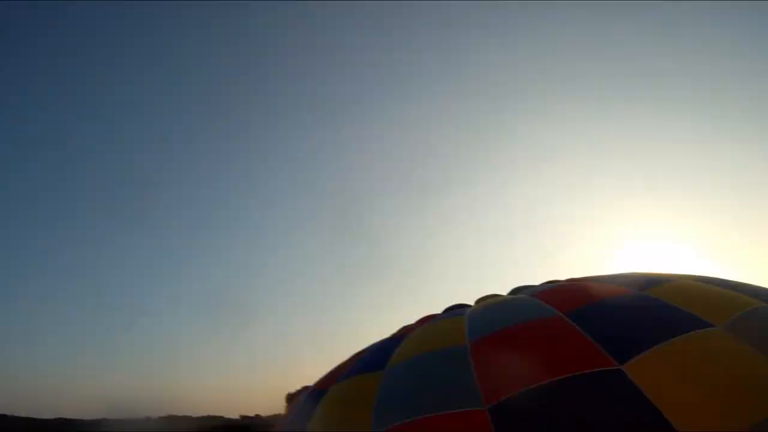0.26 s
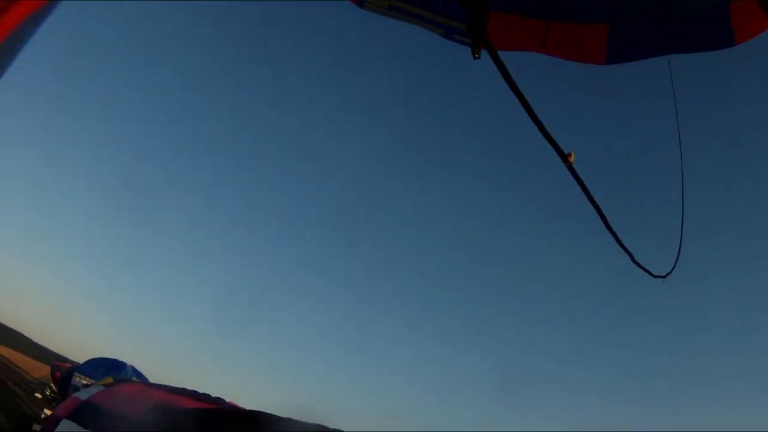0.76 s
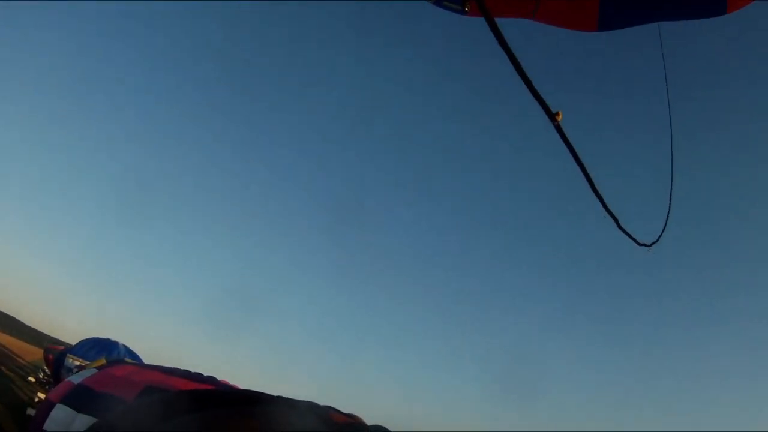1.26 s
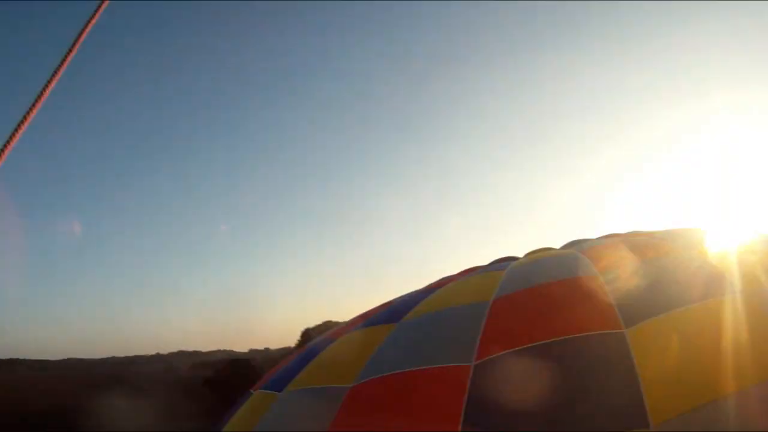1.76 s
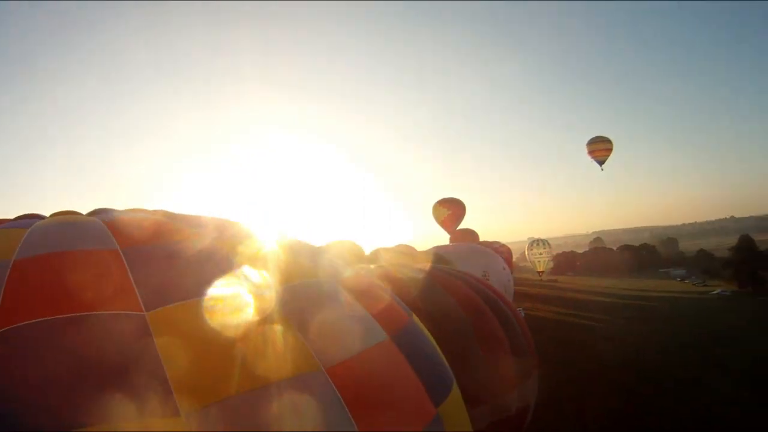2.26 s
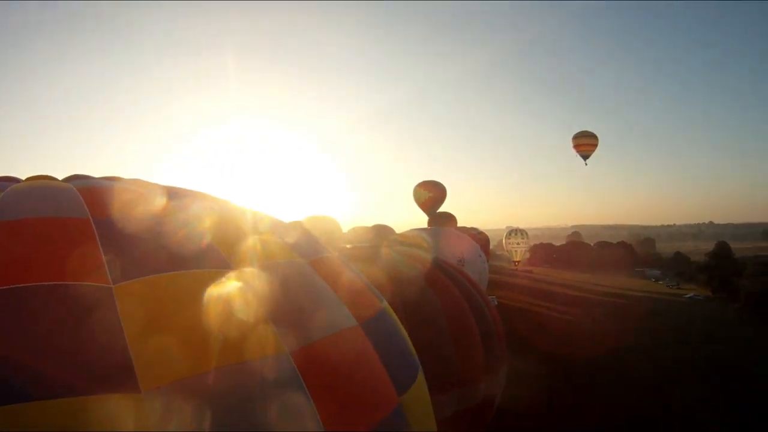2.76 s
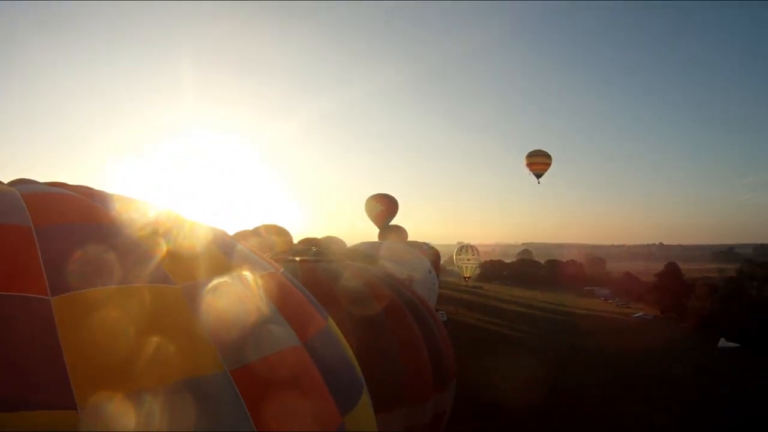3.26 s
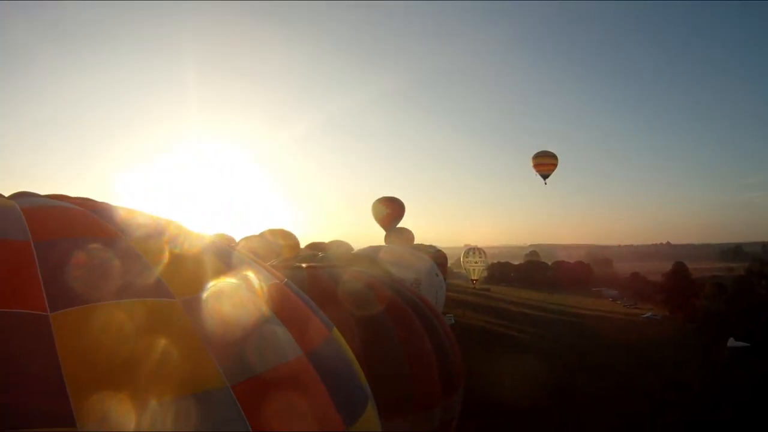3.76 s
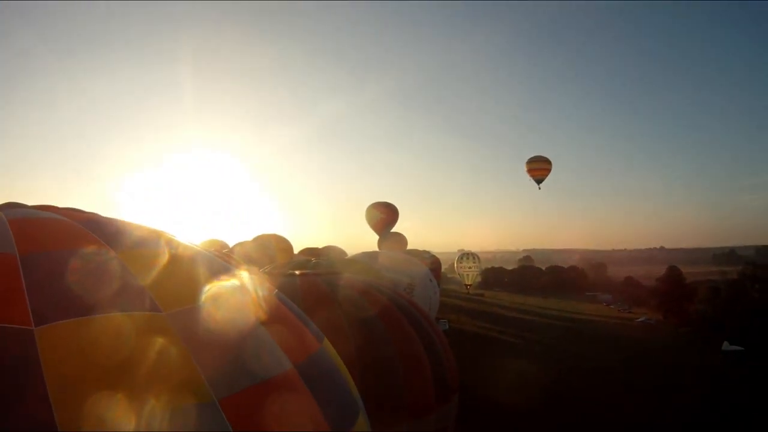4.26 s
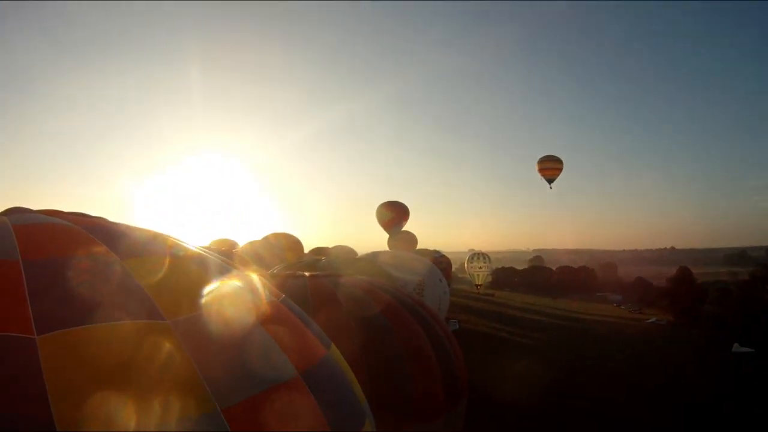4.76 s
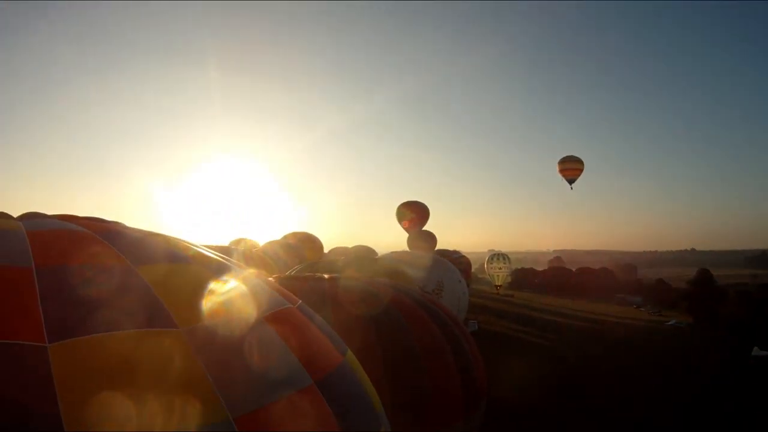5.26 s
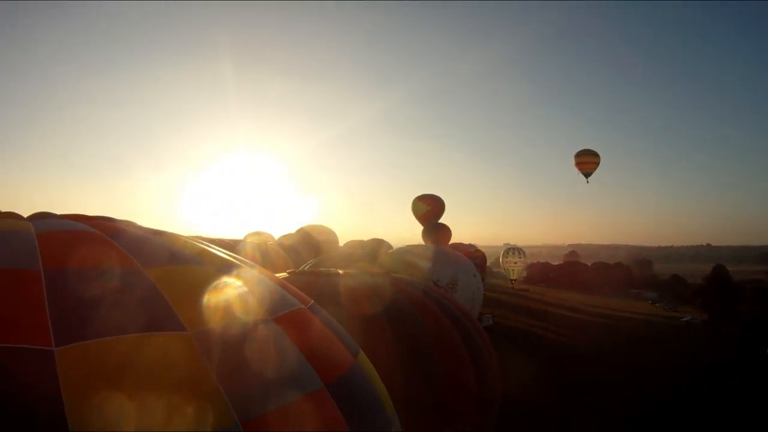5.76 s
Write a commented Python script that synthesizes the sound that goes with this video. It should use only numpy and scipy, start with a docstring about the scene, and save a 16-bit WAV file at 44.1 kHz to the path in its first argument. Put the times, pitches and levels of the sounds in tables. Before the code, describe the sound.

Close beside a small camera in a sealed housing, a hot-air balloon's gas burner is already swelling at 0 s: a low, lumpy roar with a faint jet hiss, and a boxy thump at 0.1 s. It dies away by about 0.45 s, leaving a steady, low rush and rumble from other burners. Near 1.66 s thin gas hiss escapes, then a sharp crack and heavy double thump light a long blast that builds to 2 s, swells around 2.6 and 3.5 s, and dies by 3.6 s. The softer rush remains, slowly weakening. At 4.8 s a cluster of cracks and thuds starts a harder, brighter blast, with more thumps near 5 s, fading by 5.4 s. After a short gap, a last strong blast lights at 5.6 s with several thumps and is easing as the sound ends. Peaks clip and push the level down; the sound is muffled, gritty and outdoors.

```python
"""First a balloon's gas burner is heard in mid-swell: a low roar with a jet hiss on top, then a thump.
It fires in bursts beside a small camera in a closed housing; the roar and hiss are shaped noise, and
pressure pushes make the thumps, with sharp cracks and a thin unlit hiss around some lightings.
Between bursts a steadier rush from other burners remains, made of roar, hiss and rumble noise.
The recorder turns itself down on peaks, clips, and holds every sample of a slow converter."""
import sys
import numpy as np
from scipy import signal
from scipy.fft import rfft, irfft
from scipy.io import wavfile
from scipy.ndimage import minimum_filter1d

SR = 44100
rng = np.random.default_rng(int(sys.argv[2]) if len(sys.argv) > 2 else 0)


def volts_from_db(level):
    """Convert decibel levels to linear amplitude ratios."""
    exponent = np.asarray(level, float) / 20
    return 10 ** exponent


def store_wav(level_fs):
    """Save 16-bit WAV to argv[1]."""
    pcm = np.round(np.clip(np.atleast_2d(level_fs), -1, 1) * 32767)
    wavfile.write(sys.argv[1], SR, pcm.T.astype(np.int16))


N = 264600   # length in samples: 6 s

# All source levels are those ahead of the recorder.
# The distant rush over time: t/s, roar level/dB, hiss level/dB
RUSH_LEVELS = [(.5, -34, -60.5), (.7, -34, -59), (1.0, -34, -56), (1.6, -32.5, -55.5), (3.7, -36.5, -58.5),
               (4.7, -38.5, -58.5), (5.5, -39, -58.5)]
# Noise colours, from power per Hz; only the shape counts: f/Hz, level/dB
RUSH_ROAR_COLOUR = [(12, -44), (20, -25), (54, -2.5), (202, -0.5), (221, -5.5), (489, -4.5), (597, -11.5),
                    (1120, -40), (1500, -43), (1950, -52), (3300, -120)]
RUSH_HISS_COLOUR = [(710, -34), (1200, -2.5), (1250, -8.5), (1790, -7), (2130, 1.5), (2710, -1), (3280, -6),
                    (3800, -9), (4060, -12), (4930, -10), (5340, -19.5), (5900, -22.5), (7670, -65),
                    (13000, -120)]
RUMBLE_COLOUR = [(20, -19), (50, -4), (90, -4.5), (170, -4.5), (300, -39)]
ROAR_COLOUR = [(12, -50), (20, -24), (91, -1.5), (225, 0.5), (347, -3), (498, -2), (653, -9), (769, -17.5),
               (955, -38.5), (1500, -40), (1950, -36), (3300, -120)]
JET_COLOUR = [(760, 1), (1300, -15.5), (1530, -17), (2120, -1.5), (2340, -7.5), (2580, -7), (2920, -8),
              (3360, -16.5), (3760, -18.5), (4010, -22), (4910, -11.5), (5200, -18), (5680, -29),
              (5900, -25), (7670, -63), (13000, -120)]
# Gas that streams out before it lights: start t/s, lit t/s, final level/dB
UNLIT_GAS = [(1.657, 1.694, -43.5), (1.69, 1.75, -47), (4.804, 4.815, -50)]
# Flame thumps, before the housing: t/s, peak level/dB, push length/ms, sign (push 1 or pull -1)
THUMPS = [(0.113, 0, 2.1, 1), (1.687, 1.5, 6.4, 1), (1.704, 3.5, 4.35, 1), (4.793, -11, 2.9, 1),
          (4.802, -8.5, 1.6, 1), (4.805, -3.5, 2.1, -1), (4.817, -1, 2.9, -1), (4.95, 1, 2.8, 1),
          (5.061, -1.5, 2.75, -1), (5.606, -7.5, 3.2, -1), (5.614, -4, 3.1, 1), (5.667, 0, 2.7, 1),
          (5.735, -0.5, 1.16, 1)]
# Cracks of the flame front as gas lights, before filtering: t/s, peak level/dB
CRACKS = [(1.688, 4), (1.709, -9), (4.806, 6), (5.605, -14)]
# The burner valve, levels before swells and lumps: opens t/s, full flame t/s, eases off t/s,
# shuts t/s, dying time/s, roar level/dB, jet hiss level/dB
BURSTS = [(-.1, 0.048, .15, .37, 0.097, -10.5, -34), (1.663, 1.678, 1.57, 1.73, .025, -16.5, -39.5),
          (1.74, 2.01, 3.1, 3.535, 0.079, -10.5, -30), (4.787, 4.854, 4.79, 5.32, .09, -7.5, -25.5),
          (5.589, 5.658, 5.57, 5.95, 0.059, -7, -27)]
# Swells of the flame: t/s, extra roar level/dB, half width/s (to 1/e of the extra dB)
SWELLS = [(2.58, 2, 0.12), (2.97, 1, 0.36), (3.5, 3, 0.095), (5.05, 0.5, .04), (5.22, 2, 0.033),
          (5.7, 0.5, .04)]


def rms_one(x):
    """Scale to rms 1."""
    return x / np.sqrt(np.mean(x ** 2) + 1e-20)


def in_time(rows):
    """Join the columns of a table by straight lines in time."""
    seconds, *columns = np.transpose(rows)
    return [np.interp(np.arange(N) / SR, seconds, column) for column in columns]


def coloured(spectrum):
    """Noise with the given balance of low and high sound; rms 1."""
    hz, db = np.transpose(spectrum)
    log_hz = np.log(np.arange(N // 2 + 1) * SR / N + 1)   # the 1 avoids log of zero
    shape = volts_from_db(np.interp(log_hz, np.log(hz), db, -90, -90))
    return rms_one(irfft(rfft(rng.standard_normal(N)) * shape, N))


def drift(pole_hz):
    """Slow chance wandering: noise through two equal low-pass filters; rms 1."""
    r = np.exp(-2 * np.pi * pole_hz / SR)
    noise = rng.standard_normal(N + SR)
    slow = signal.lfilter([1], [1, -2 * r, r * r], noise)
    return rms_one(slow[SR:])   # the first second lets the filter settle


def rush():
    """Far burners: a smooth roar and hiss over a slowly lumping rumble."""
    rumble_db = -9   # relative to the rush's roar
    roar_db, hiss_db = in_time(RUSH_LEVELS)
    roar = volts_from_db(roar_db + 0.93 * drift(25)) * coloured(RUSH_ROAR_COLOUR)
    hiss = volts_from_db(hiss_db + 0.5 * drift(14)) * coloured(RUSH_HISS_COLOUR)
    rumble = volts_from_db(roar_db + rumble_db + 0.5 * drift(3.4)) * coloured(RUMBLE_COLOUR)
    return roar + hiss + rumble


def unlit_gas():
    """Streaming gas makes a thin bright hiss that swells until the flame catches."""
    t, swell = np.arange(N) / SR, np.zeros(N)
    for start, lit, db in UNLIT_GAS:
        swell += volts_from_db(db) * np.interp(t, [start, lit, lit + 0.003], [0, 1, 0])
    band = signal.butter(2, [2800, 5000], "band", fs=SR, output="sos")
    return swell * rms_one(signal.sosfilt(band, rng.standard_normal(N)))


def pressure_pushes():
    """Each pressure push has an opposite swing before and after it; a negative sign flips it all."""
    out = np.zeros(N)
    for s, db, ms, sign in THUMPS:
        near = np.arange(-1200, 1200) + round(s * SR)
        u = (near / SR - s) / (ms / 1000)   # time in push lengths
        before = -0.5 * np.exp(2.8 * np.minimum(u, 0))
        push = np.where(u > 0, np.sin(np.pi * np.clip(u, 0, 1)) ** 0.85, before)
        after = 0.48 * np.exp(-np.abs(u - 2)) * (u > 1)
        out[near] += np.sign(sign) * volts_from_db(db) * (push - after)
    return out


def in_housing(pushes):
    """The closed housing rings briefly at one pitch and dulls the pressure pushes."""
    housing_hz, width_hz, ring_gain = 400, 90, 2.2
    r, w = np.exp(-np.pi * width_hz / SR), 2 * np.pi * housing_hz / SR
    feed = np.array([1, 0, -1]) * (1 - r * r) / 2
    ring = signal.lfilter(feed, [1, -2 * r * np.cos(w), r * r], pushes + 1e-18)
    low_pass = signal.butter(5, 750, fs=SR, output="sos")
    return signal.sosfilt(low_pass, pushes + ring_gain * ring)


def flame_cracks():
    """The flame front cracks as gas lights: a very short spike gives a body and a thin bright edge."""
    crack_s, edge_db = 0.00015, -27   # rise and fall time constant; edge level
    spikes = np.zeros(N)
    for s, db in CRACKS:
        spikes += volts_from_db(db) * np.exp(-np.abs(np.arange(N) / SR - s) / crack_s)
    band = signal.butter(3, [600, 1500], "band", fs=SR, output="sos")
    body = signal.sosfilt(band, spikes + 1e-18)
    edge = np.diff(spikes, prepend=0) * crack_s * SR   # slope of the spike
    return body + volts_from_db(edge_db) * edge


def thumps():
    """Pressure pushes ringing in the housing, plus the cracks of the flame front."""
    return in_housing(pressure_pushes()) + flame_cracks()


def valve_db(t, burst, first_db, slow_db_per_s, sag_db_per_s, dying_db):
    """Level set by the valve: a first jump, a rise to full flame, a sag on easing, then dying gas."""
    opens, full, eases, shuts, dying_s = burst[:5]
    opening_s, shut_db = 0.013, -42
    times = [opens, opens + opening_s, max(full, opens + 2 * opening_s)]
    first = first_db - slow_db_per_s * (full - opens)   # a longer rise starts lower
    rise = np.interp(t, times, [shut_db, first, 0])
    easing = np.maximum(t - eases, 0)
    dying = np.maximum(t - shuts, 0) / dying_s
    return rise - sag_db_per_s * easing - dying_db * dying


def burner():
    """Turbulent burning roars in lumps; the gas jet hisses, partly shaken by the same lumps."""
    out_db_per_s = 900   # the flame goes out after the gas left in the pipe burns down
    jet_swell = 1.34     # dB of hiss swell for each dB of roar swell
    t, out = np.arange(N) / SR, np.zeros(N)
    lumps = drift(46)
    roar = coloured(ROAR_COLOUR) * volts_from_db(1.3 * lumps + 0.37 * drift(12))
    jet = coloured(JET_COLOUR) * volts_from_db(0.65 * lumps + 0.087 * drift(27))
    swell_db = sum(db * np.exp(-((t - s) / width) ** 2) for s, db, width in SWELLS)
    for burst in BURSTS:
        opens, _, _, shuts, dying_s, roar_db, jet_db = burst
        flame_db = valve_db(t, burst, first_db=-5.5, slow_db_per_s=3.5, sag_db_per_s=14.5, dying_db=11)
        gas_db = valve_db(t, burst, first_db=-4, slow_db_per_s=31, sag_db_per_s=29, dying_db=13)
        burning = volts_from_db(roar_db + flame_db + swell_db) * roar
        hissing = volts_from_db(jet_db + gas_db + jet_swell * swell_db) * jet
        gone_db = out_db_per_s * np.maximum(t - shuts - dying_s, 0)
        out += (t > opens) * volts_from_db(-gone_db) * (burning + hissing)
    return out


def scene():
    """Far rush, unlit gas, thumps and burner at one microphone."""
    return (rush() + unlit_gas() + thumps() + burner())[None]


def gain_control(x):
    """Peaks over the knee pull the gain down; it waits, then climbs back at a steady rate."""
    knee_db, squeeze = -13, 0.65   # dB of cut for each dB over the knee
    hold_s, smooth_s = 0.064, 0.0021
    fall_db_per_s = 186   # how fast the remembered peak level falls
    fall, half_hold = fall_db_per_s * np.arange(N) / SR, round(hold_s * SR / 2)
    level = 20 * np.log10(np.abs(x) + 1e-9)
    # the loudest level within the past hold time
    recent = -minimum_filter1d(-level, 2 * half_hold + 1, origin=half_hold)
    remembered = np.maximum.accumulate(recent + fall, axis=1) - fall
    cut_db = squeeze * np.maximum(remembered - knee_db, 0)
    r = np.exp(-1 / (smooth_s * SR))
    start = cut_db[:, 2000:2001] * r   # begin with the gain already turned down
    smooth_cut_db = signal.lfilter([1 - r], [1, -r], cut_db, zi=start)[0]
    return x * volts_from_db(-smooth_cut_db)


def soft_top(x):
    """Overload: straight for small swings, rounding off just under full scale."""
    return x / (1 + np.abs(x / 0.99) ** 8) ** (1 / 8)


def sample_and_hold(x):
    """A slow converter holds each sample four times, adding mirrored copies around its rate."""
    converter_hz = 12000
    down, up = SR // 300, converter_hz // 300   # both rates divided by 300 Hz
    slow = signal.resample_poly(x, up, down, axis=1)
    held = np.repeat(slow, 4, axis=1)
    return signal.resample_poly(held, down, 4 * up, axis=1)[:, :N]


def treble_limit(x):
    """The treble rolls off gently, then is cut steeply."""
    roll_off = signal.butter(2, 13900, fs=SR, output="sos")
    cut = signal.cheby2(16, 80, 16600, fs=SR, output="sos")
    return signal.sosfilt(cut, signal.sosfilt(roll_off, x))


def top_cut(x):
    """Nothing passes above the cut-off."""
    return signal.sosfilt(signal.butter(12, 16440, fs=SR, output="sos"), x)


def record(dry):
    """Preamplifier, gain control, overload, slow converter and treble limit."""
    preamp_db = 11.5
    levelled = gain_control(dry * volts_from_db(preamp_db))
    converted = sample_and_hold(soft_top(levelled))
    mix = treble_limit(converted)
    return top_cut(mix)


dry = scene()
out = record(dry)
store_wav(out)
```